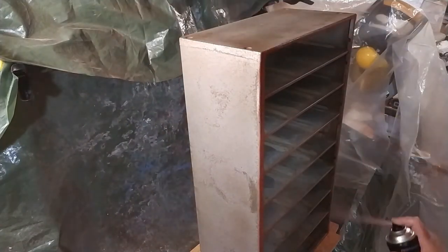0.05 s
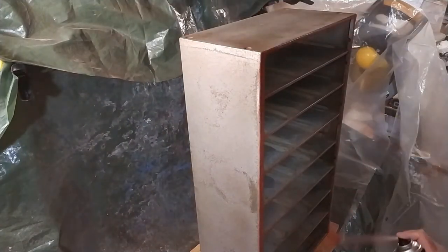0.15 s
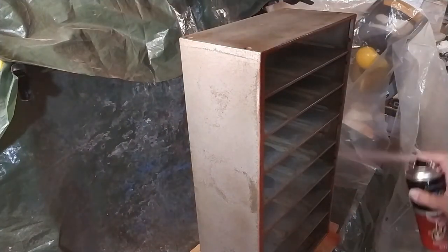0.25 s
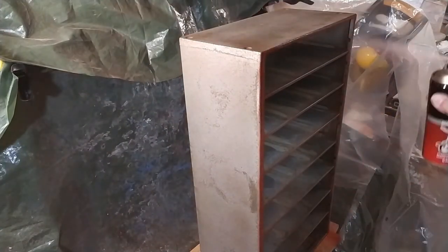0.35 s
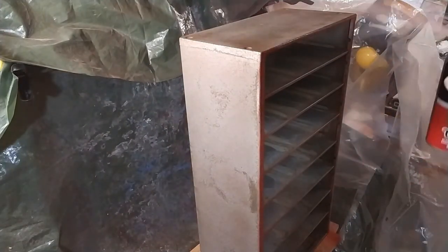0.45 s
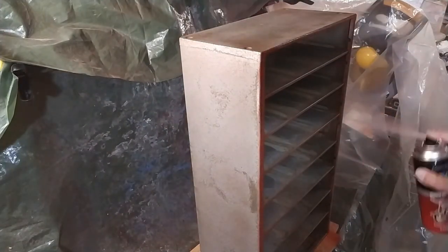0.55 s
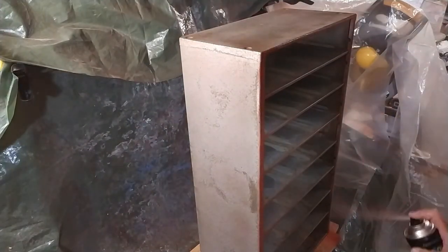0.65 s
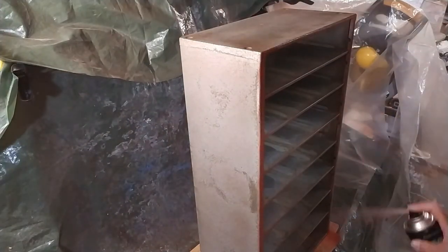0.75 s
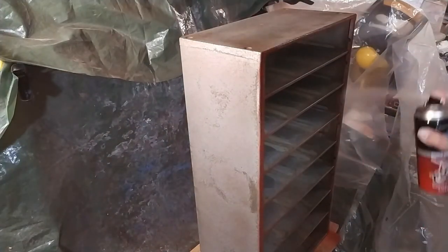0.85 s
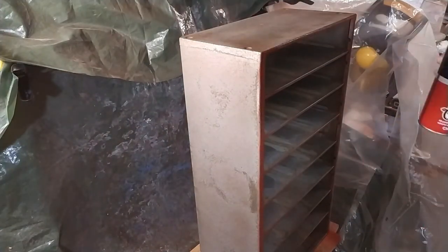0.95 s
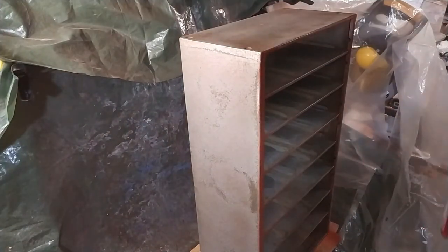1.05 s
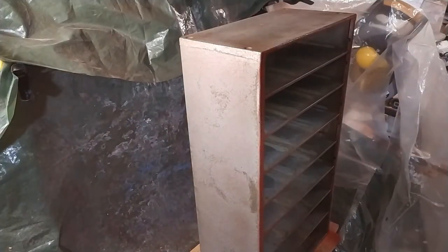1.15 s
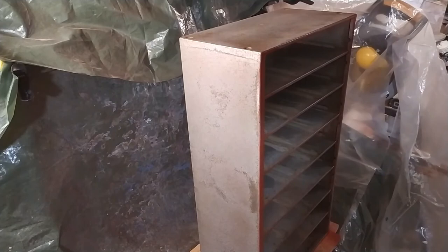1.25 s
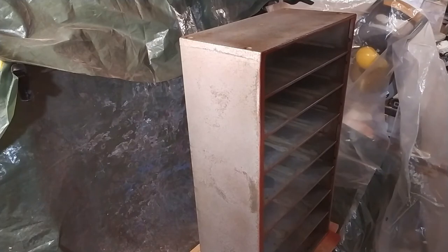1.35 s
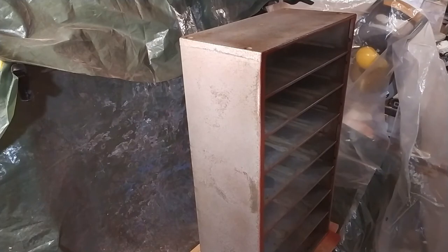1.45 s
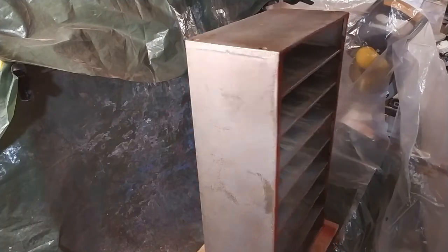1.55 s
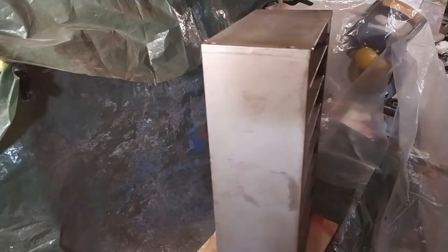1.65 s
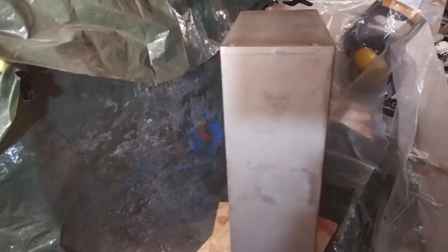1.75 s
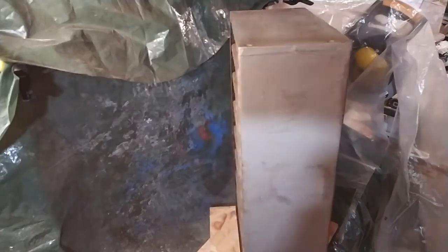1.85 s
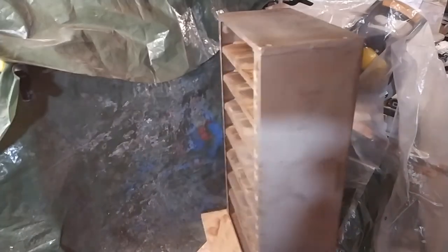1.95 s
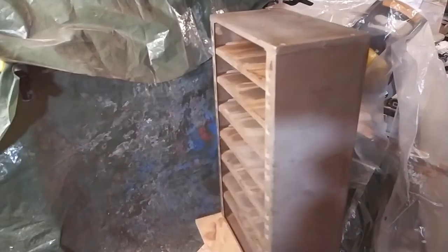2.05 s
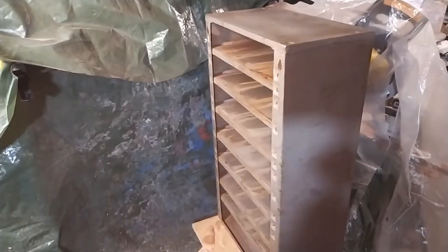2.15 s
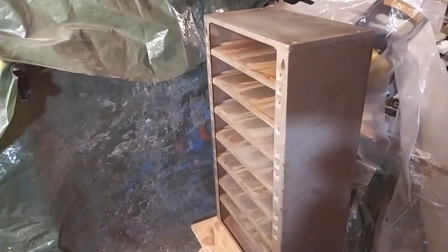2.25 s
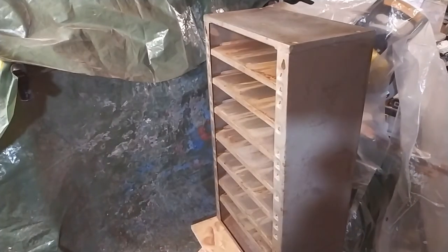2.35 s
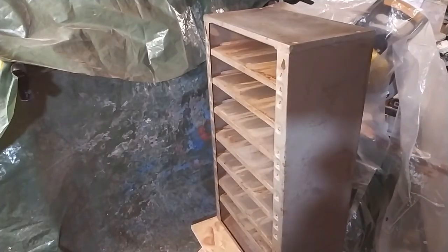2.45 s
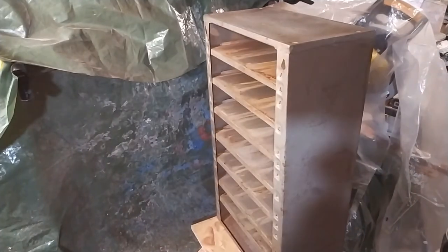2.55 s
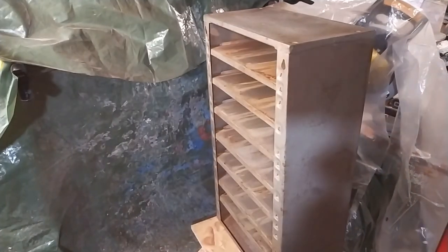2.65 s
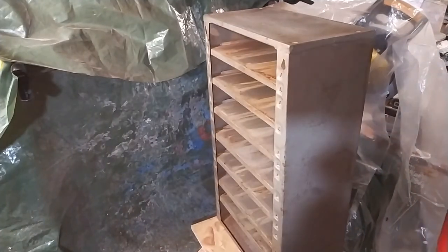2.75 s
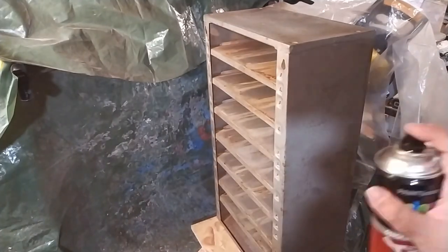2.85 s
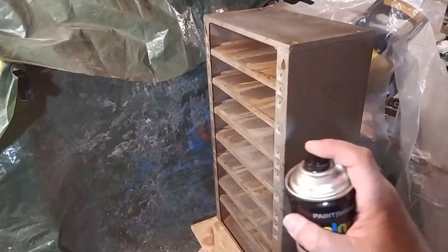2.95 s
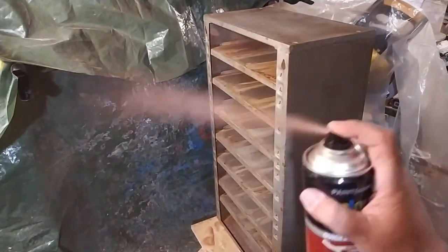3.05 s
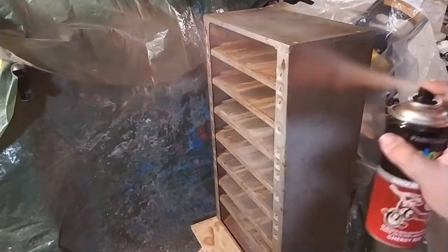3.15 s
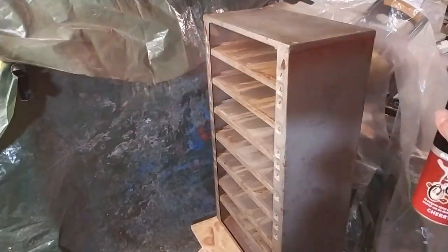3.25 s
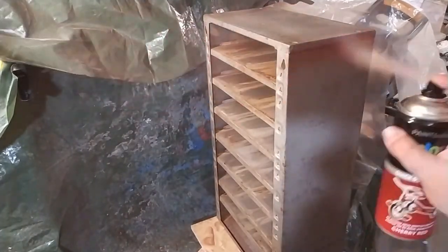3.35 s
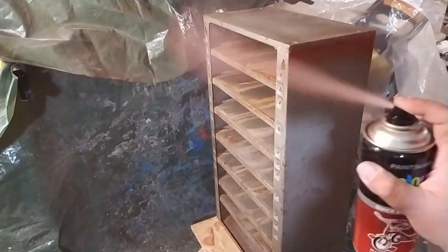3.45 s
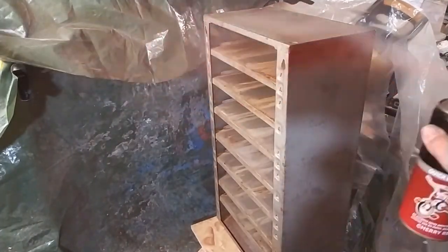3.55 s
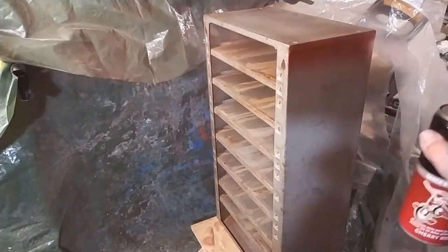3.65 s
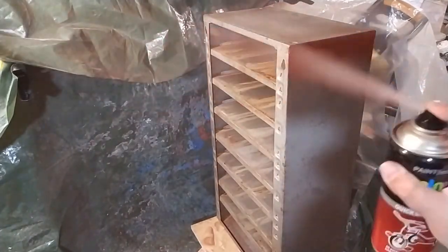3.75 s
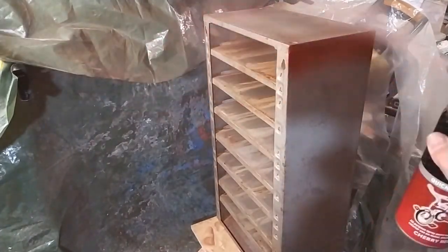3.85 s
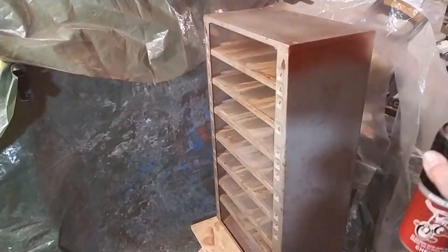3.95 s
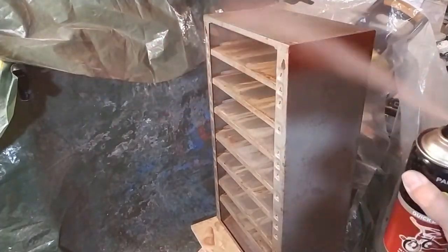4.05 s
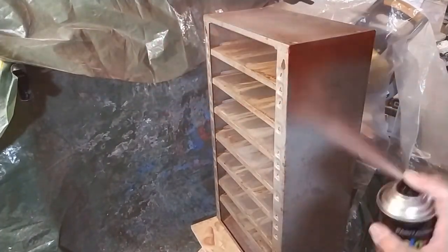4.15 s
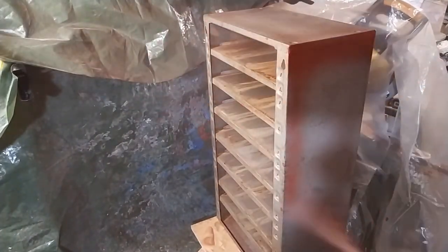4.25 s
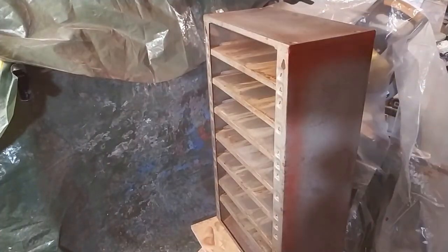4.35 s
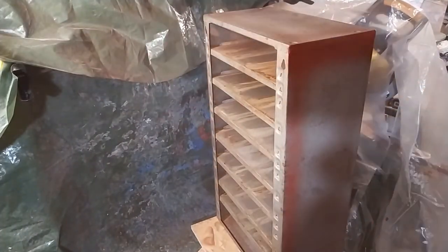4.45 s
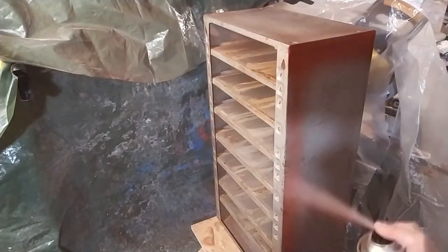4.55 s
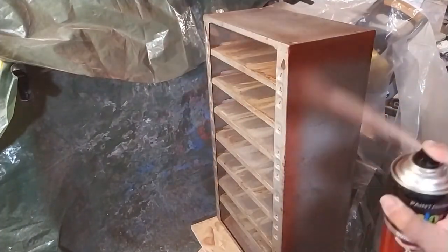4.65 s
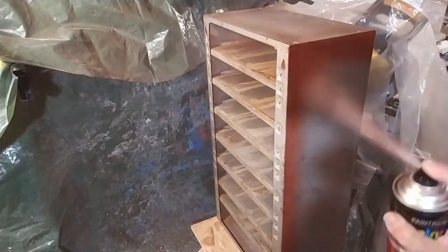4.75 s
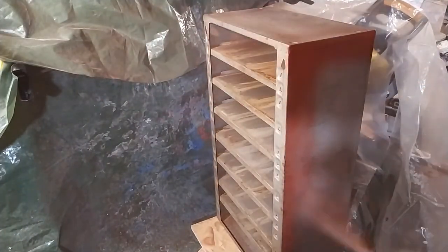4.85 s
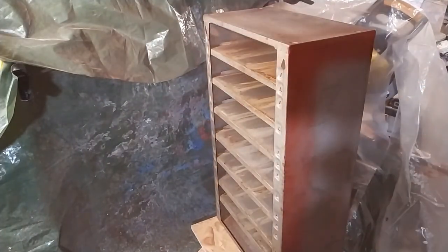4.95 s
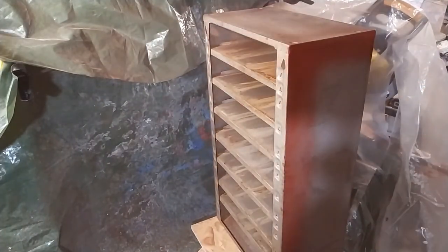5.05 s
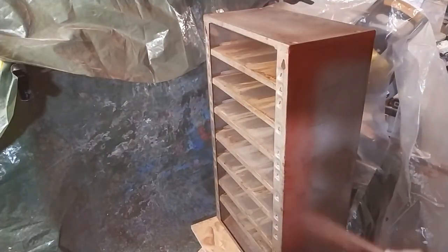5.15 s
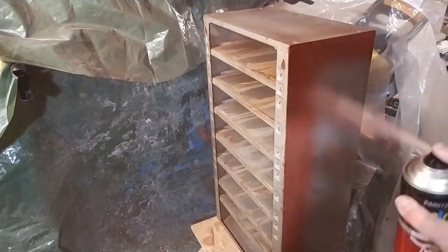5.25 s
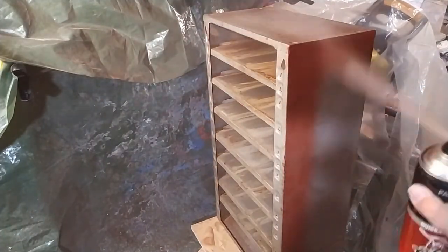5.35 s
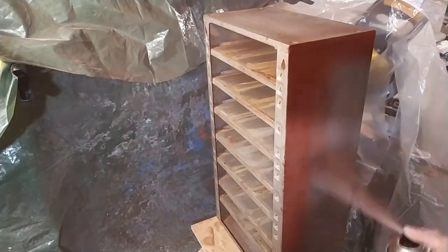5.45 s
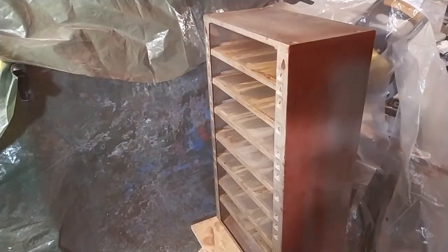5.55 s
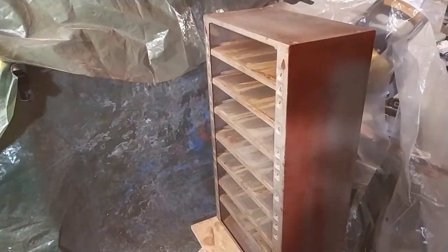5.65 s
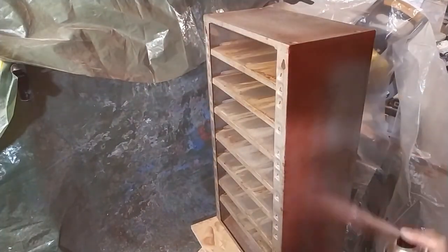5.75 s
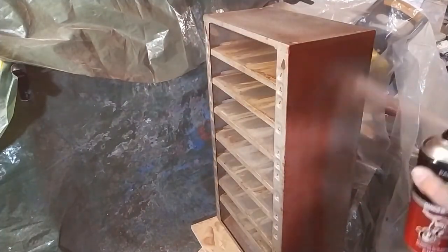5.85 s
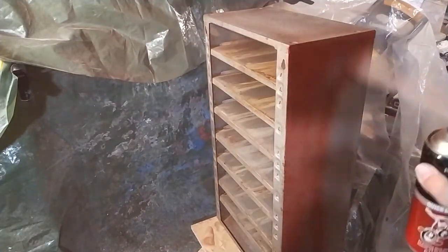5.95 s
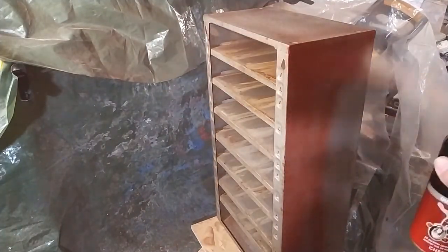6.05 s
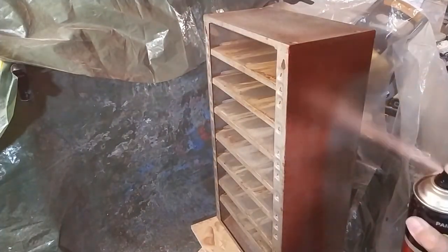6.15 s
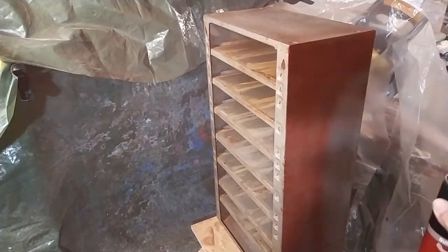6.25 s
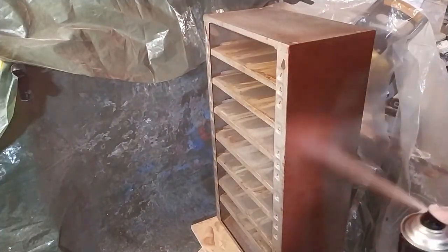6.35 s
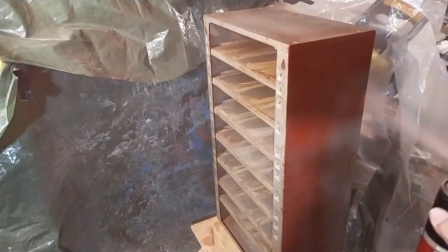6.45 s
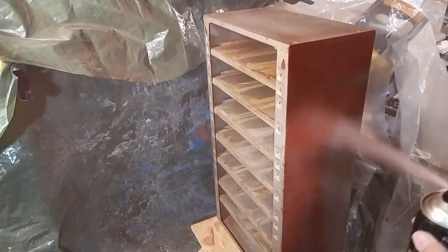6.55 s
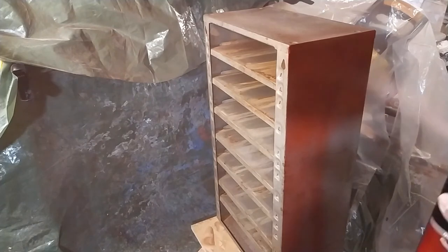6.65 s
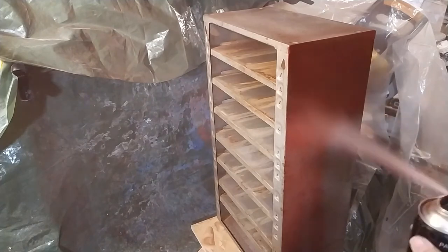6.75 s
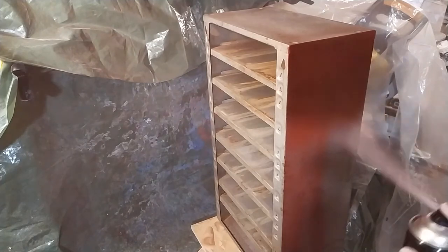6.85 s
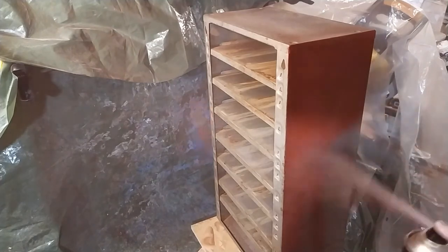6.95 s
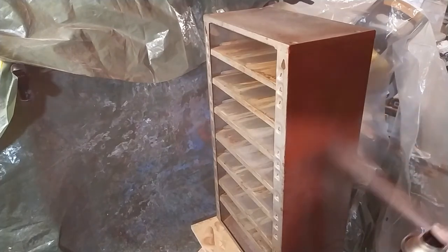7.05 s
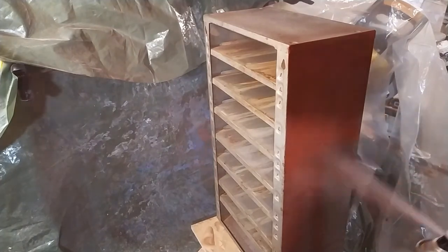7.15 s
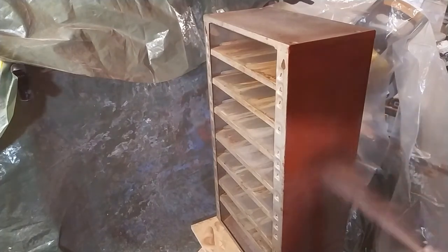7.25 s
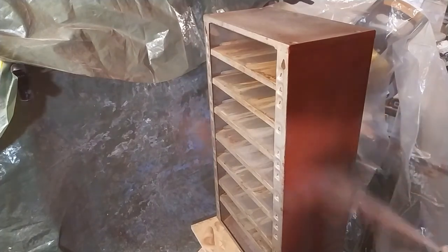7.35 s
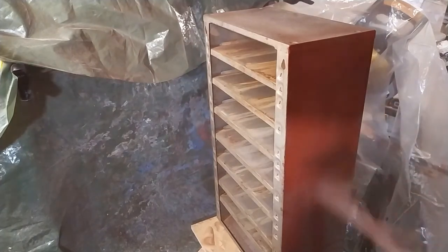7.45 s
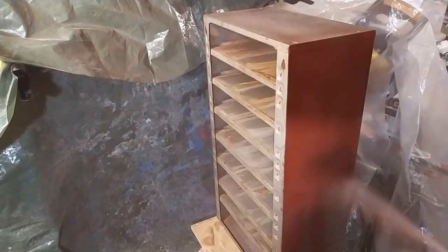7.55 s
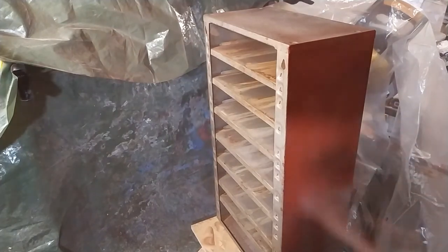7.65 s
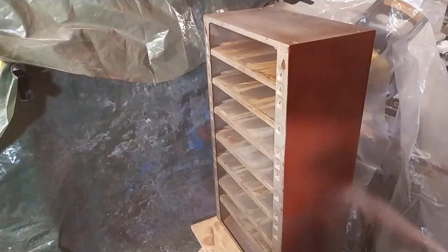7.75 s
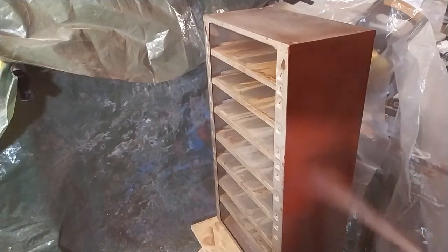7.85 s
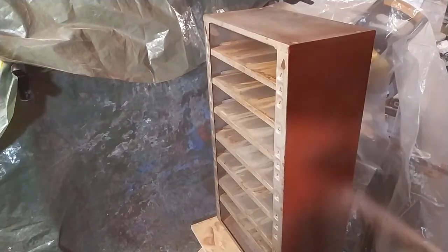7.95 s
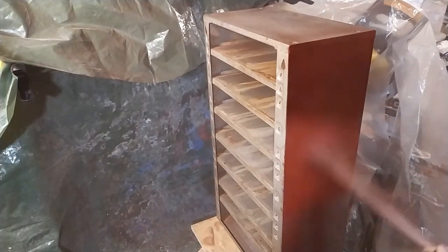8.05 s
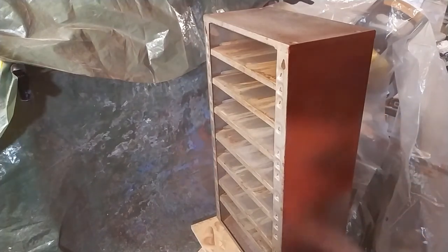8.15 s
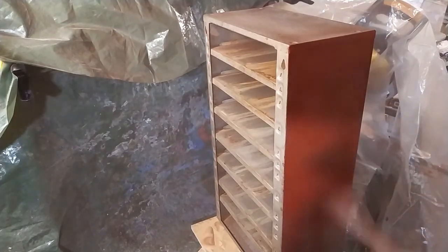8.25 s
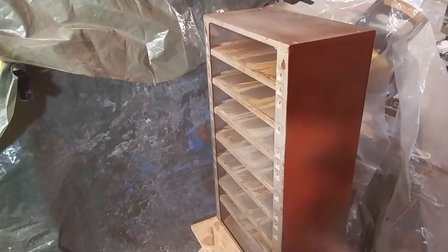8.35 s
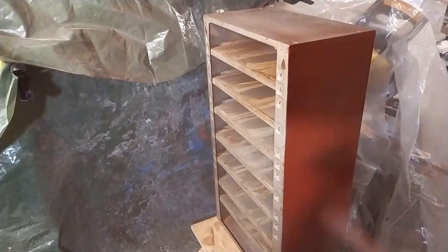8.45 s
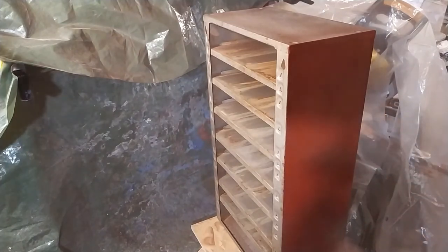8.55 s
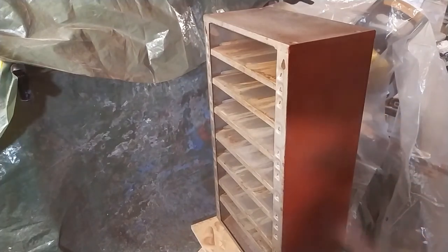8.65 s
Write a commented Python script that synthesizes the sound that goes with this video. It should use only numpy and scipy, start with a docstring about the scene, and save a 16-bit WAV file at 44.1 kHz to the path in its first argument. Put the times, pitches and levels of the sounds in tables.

```python
"""First, close to the microphones, the hiss of an aerosol can spraying a small wooden cabinet.
The place is a workshop hung with plastic sheets. The hiss swirls as the hand sweeps, because its echoes
from cabinet and sheets keep shifting. It stops after a second, and the cabinet is turned on its board
with ticks, scuffs and rustles. The second press opens with a spurt and sags slightly as the can cools.
Behind it all are moving air and a low rumble; later a motor hums far off, through the walls."""
import sys
import numpy as np
from scipy import signal
from scipy.fft import rfft, irfft, next_fast_len
from scipy.io import wavfile
from scipy.ndimage import uniform_filter1d, map_coordinates

SR = 44100
rng = np.random.default_rng(int(sys.argv[2]) if len(sys.argv) > 2 else 0)


def to_wav(s):
    """Save 16-bit WAV."""
    ch = np.atleast_2d(s).T  # columns
    pcm = np.round(np.clip(ch, -1, 1) * 32767)  # PCM
    wavfile.write(sys.argv[1], SR, pcm.astype(np.int16))


N = 383229

# the valve held down, the first time from before the start: open t/s, shut t/s
PRESSES = [(-1, .946), (3.05, 10)]
# each press, into the open shelves, then on the side panel: jet/dB, hollows/dB, background turned down/dB
PRESS_LEVELS = [(-35.5, -56, -1), (-32, -56.5, 17)]
# strokes of the can, higher is nearer the microphones: t/s, height/m
STROKES = [(0, 0.15), (.5, 0.28), (.75, 0.135), (1, 0.29), (3.05, 0.301), (3.35, 0.47), (3.85, 0.371),
           (4.12, 0.45), (4.43, 0.004), (4.63, 0.352), (4.8, 0.405), (4.95, 0.0676), (5.1, 0.0361),
           (5.27, 0.392), (5.42, 0.357), (5.56, 0.093), (5.72, 0.08), (5.9, 0.474), (6.7, 0.452),
           (7.05, 0.274), (7.5, 0.0816), (8, 0.2138), (8.4, 0.026), (8.69, 0.0535)]
# the jet at the nozzle: f/Hz, level/dB
JET_SPECTRUM = [(3600, -37), (6200, -11.5), (7300, -11), (9200, -8), (10500, -6.5), (12500, -4), (14500, 1),
                (15700, 2)]
# the jet below 11 kHz: t/s, gain/dB
JET_BODY_GAIN = [(.5, 2), (3.05, -1.7), (3.9, -0.5), (4.5, 0.5), (5.5, 0), (6.1, -.5), (6.8, 1), (7.5, 2.3),
                 (8.69, 0.8)]
# the jet above 11 kHz: t/s, gain/dB
SIZZLE_GAIN = [(0, 2), (.95, 2), (3.05, -0.5), (3.6, -1.5), (4, 0.5), (4.4, 0.5), (4.85, 1), (5.3, 1),
               (5.7, 1), (6.1, -3), (6.8, -0.7), (7.5, 2), (8.1, 1), (8.69, 2.2)]
# centre of the bright band in the hiss: t/s, f/Hz
SWISH_CENTRE = [(3.4, 10930), (3.9, 11500), (5.3, 12280), (6.2, 10960), (6.6, 9800), (6.9, 8800),
                (7.4, 7440), (8.69, 7300)]
# mist washing over the wood: f/Hz, level/dB
WASH_SPECTRUM = [(1100, -20), (1650, -5.5), (2300, 0.5), (3000, 0), (4200, 1), (5700, 3.5), (6200, -18),
                 (8300, -53)]
# swell of that mist: t/s, gain/dB
WASH_GAIN = [(0, 1.5), (.3, 1.5), (.5, 0), (.95, 1), (3.1, -1), (4, 0.5), (6.2, -0.5), (7, -0.8),
             (7.7, 0.5), (8.69, -2)]
# resonances of the gap between can and cabinet, moving with the can's height:
# f/Hz, half width/Hz, glide/(Hz/m), left gain/dB, right gain/dB, swell/(dB/m)
GAP_PEAKS = [(1909, 327, 450, -22, -27.5, 17.5), (2660, 295, -150, -26, -32.5, -31),
             (3567, 430, 650, -24, -23, 11), (4848, 370, 1500, -21.5, -21.5, 8),
             (5460, 520, -100, -19, -21.5, -4)]
# the cabinet's hollows: f/Hz, level/dB
HOLLOW_SPECTRUM = [(90, -14.5), (130, -8), (172, 2), (235, -16), (325, -1), (390, -3), (470, -1.5),
                   (560, 0), (660, 0), (780, -3), (940, -3), (1100, 0.5), (1300, -2.5), (1480, -2.5),
                   (1900, -12.5), (2500, -30.5)]
# further short echoes from sheets and floor, which make the hiss swirl:
# delay/ms, path change per height/(m/m), relative level/dB, lag at the right microphone/ms
SHEET_ECHOES = [(.9, 0.706, -3.5, 0.448), (1.7, -0.891, -4.5, -0.516), (2.8, -0.59, -2, 0.69),
                (4.098, 1.192, -6.5, -0.785), (6.3, 0.782, -1.5, 0.601)]
# ticks of board and sheets: t/s, relative level/dB, f/Hz, t60/s
TICKS = [(1.017, -34, 1130, 0.0047), (1.068, -46, 1510, .008), (1.082, -43, 4200, .002),
         (1.272, -42, 2010, 0.0052), (1.407, -50, 1650, .006), (1.593, -41, 2010, 0.0063),
         (1.673, -48, 1190, 0.0069), (1.77, -48, 6970, .002), (1.894, -39.5, 1210, 0.0074),
         (1.915, -46, 3750, 0.0068), (1.954, -47, 1400, .008), (1.972, -49, 1600, .006),
         (2.045, -39, 4300, 0.0032), (2.408, -44, 1720, .009), (2.59, -40, 6960, 0.0013),
         (2.718, -40, 9400, 0.0022), (3.015, -46, 1500, .006)]
# modes of one tick: multiple of its pitch, relative level/dB
TICK_MODES = [(.42, -10), (.71, -8), (1, -2), (1.43, -6)]
# the board scuffs as it turns: t/s, level/dB, rise/s, t60/s
SCUFFS = [(1.06, -56, 0.018, 0.17), (1.517, -51, .005, 0.17), (1.58, -59, .01, .2),
          (1.912, -54, .005, 0.17), (2.11, -47.5, 0.022, 0.31), (2.168, -46, .001, 0.064),
          (2.21, -46, 0.0047, 0.18), (2.5, -50, 0.0053, 0.092)]
# the scraping board: f/Hz, level/dB
SCUFF_SPECTRUM = [(300, -7.5), (900, -4), (2200, -2), (4000, -7.5), (8000, -11.5), (15000, -15)]
# the rolling board: f/Hz, level/dB
ROLL_SPECTRUM = [(60, -20), (150, 3), (200, 12.5), (260, -3), (340, 7), (600, -12), (1500, -33)]
# sheets and sleeve rustle near the cabinet: t/s, level/dB, length/s
RUSTLES = [(1.092, -59.5, 0.066), (1.233, -69, .04), (1.527, -54.5, 0.028), (1.765, -58, .015),
           (2.172, -46.5, 0.015), (2.227, -58, 0.048), (2.346, -59, .02), (2.714, -62, 0.072),
           (2.854, -57, 0.23), (3.027, -53.5, 0.038)]
# the rustling plastic: f/Hz, level/dB
RUSTLE_SPECTRUM = [(1000, 5), (4000, 5.5), (8000, -5.5), (9400, 2), (10500, -5), (15800, -4)]
# the motor beyond the walls: t/s, f/Hz, relative level/dB
MOTOR_RUN = [(5.2, 90.8, -64), (5.38, 97.4, -68), (5.93, 94.2, -63), (6.33, 59, -65.5), (6.45, 58.8, -57),
             (6.61, 65.9, -59), (6.75, 71.2, -50.5), (7.04, 74.2, -63.5), (8.31, 77.5, -61),
             (8.69, 82, -67)]
# air moving through the workshop: f/Hz, level/dB
AIR_SPECTRUM = [(70, -25), (130, -40), (190, -1), (260, -14), (330, 0), (470, 0.5), (950, -4), (1150, -1),
                (1900, 0), (2600, -3.5), (5200, -7), (7200, -16), (10600, -21.5), (15800, -20.5)]
# the workshop's low rumble: f/Hz, level/dB
RUMBLE_SPECTRUM = [(10, -48), (18, 2), (38, -5.5), (75, -4), (110, -6.5), (160, -26), (230, -40)]
# decay of the draped room: f/Hz, t60/s
ROOM_DECAY = [(200, 0.18), (2000, 0.075), (8000, 0.13), (15000, 0.027)]
# likeness of diffuse sound at the two microphones: f/Hz, correlation
MIC_CORRELATION = [(60, 0.42), (300, 0.81), (700, 0.71), (1400, 0.21), (3000, -0.28), (7000, 0.11)]
# balance of the microphones: f/Hz, left over right/dB
MIC_BALANCE = [(60, 4.5), (400, 7), (1300, 3.5), (2400, 1), (4400, 0.5), (8000, -0.1), (13000, -0.9)]

SPURT_DB, SPURT_S = 2.5, 0.031  # the opening spurt of a press, and the time to its crest
SAG_DB_PER_S = 0.02  # the can cools and loses pressure
JET_LIFT_DB_PER_M, HOLLOW_LIFT_DB_PER_M = 8.5, 2.5  # louder as the can rises towards the microphones
WASH_DB, WASH_SPURT_DB = -17.5, 5.5  # the mist's broad rush; the mist's rise in the spurt
# the cabinet's strong echo: delay, path change per height, lag at the right microphone
CABINET_MS, CABINET_FOLLOW, CABINET_SKEW_MS = 2.45, 0.17, 0.053
ROLL_DB, ROLL_START_S, ROLL_STOP_S = -65, 1.58, 2.08
AIR_DB, RUMBLE_DB = -57, -62.0
TOP_HZ = 15950
SOUND_SPEED = 343  # m/s


def spray():
    """Close up: the nozzle's jet hisses, mist washes over the wood and the cabinet's hollows answer."""
    age, press_db, hollow_db = press()
    spurt = (age / SPURT_S * np.exp(1 - age / SPURT_S)) ** 2
    sag_db = SAG_DB_PER_S * age
    # paint and gas leave unevenly, so the flow flutters a little
    flow = valve(open_s=0.012, shut_s=0.0092) * amp(0.89 * wobble(30) + 0.14 * wobble(270))
    nozzle = flow * jet(press_db + SPURT_DB * spurt - sag_db)
    mist = flow * amp(press_db + WASH_SPURT_DB * spurt) * wash()
    hollow = flow * amp(hollow_db + HOLLOW_LIFT_DB_PER_M * can_height() - sag_db) * hollows()
    hiss = sweep(np.array([nozzle, nozzle]), lead_ms=0.096, cabinet_db=-5, sheets_db=-2.5, sway_m=0.0356)
    on_wood = sweep(mist, lead_ms=0.082, cabinet_db=-3, sheets_db=-0.5, sway_m=0.0591)
    return hiss + on_wood + hollow


def jet(pressure_db):
    """Gas rushes from the nozzle; the body of the hiss and its top sizzle swell separately."""
    rush = noise(JET_SPECTRUM, patchy_db=5.5)
    treble = filtered(rush, lambda hz: 1 / (1 + (11000 / (hz + 1)) ** 12))
    sizzle = amp(curves(SIZZLE_GAIN)[0]) * treble
    body = amp(curves(JET_BODY_GAIN)[0]) * (rush - treble)
    return amp(pressure_db + aim_db()) * (sizzle + body + swish())


def swish(gain_db=-23, lift_db_per_m=13):
    """A bright band of the hiss that glides in pitch and swells at the top of each stroke."""
    return amp(gain_db + lift_db_per_m * can_height()) * band(curves(SWISH_CENTRE)[0], half_width_hz=890)


def wash():
    """Mist on the wood: a broad rush under gap resonances that glide and trade places along a stroke."""
    height = can_height()
    out = amp(WASH_DB) * noise(WASH_SPECTRUM, patchy_db=3.0)
    for hz, width_hz, glide, left_db, right_db, swell in GAP_PEAKS:
        peak = amp(swell * height) * band(hz + glide * height, width_hz)
        out = out + amp([[left_db], [right_db]]) * peak
    return amp(curves(WASH_GAIN)[0]) * out


def hollows(echo_db=-3.5):
    """The low body of the spray; the cabinet's echo cuts notches in it that wander with the hand."""
    body = diffuse(HOLLOW_SPECTRUM, patchy_db=8.0) * amp(0.41 * wobble(16))
    reflected = echo(body, CABINET_MS, CABINET_FOLLOW, sway_m=0.051, skew_ms=CABINET_SKEW_MS)
    return unit(body + amp(echo_db) * reflected)


def valve(open_s, shut_s):
    """The flow, 0 to 1: the stem sinks and springs back within a few hundredths of a second."""
    return sum(gate(on, off, open_s, shut_s) for on, off in PRESSES)


def press():
    """For every sample: time since the valve opened, and the jet and hollow levels of that press."""
    on, off = np.transpose(PRESSES)
    jet_db, hollow_db, _ = np.transpose(PRESS_LEVELS)
    which = np.searchsorted((off[:-1] + on[1:]) / 2, clock())
    return np.maximum(clock() - on[which], 0), jet_db[which], hollow_db[which]


def can_height():
    """The can's height above the middle of its strokes, in m."""
    height = uniform_filter1d(curves(STROKES)[0], size=SR // 5)
    return height - height.mean()


def aim_db(flick_start_s=5.74, flick_hz=5, flick_db=0.5):
    """The hand sets the level: strokes up and down, later quick wrist flicks, and a slight tremor."""
    flicks = np.sin(2 * np.pi * flick_hz * np.maximum(clock() - flick_start_s, 0))
    return JET_LIFT_DB_PER_M * can_height() + flick_db * flicks + 0.5 * wobble(6.5)


def sweep(pair, lead_ms, cabinet_db, sheets_db, sway_m):
    """Direct sound, left first, plus echoes that follow the hand: a drifting comb at each microphone."""
    out = np.array([pair[0], late(pair[1], lead_ms / 1000)])
    out += amp(cabinet_db) * echo(pair, CABINET_MS, CABINET_FOLLOW, sway_m, CABINET_SKEW_MS)
    for delay_ms, follow, db, skew_ms in SHEET_ECHOES:
        out += amp(sheets_db + db) * echo(pair, delay_ms, follow, sway_m, skew_ms)
    return out * np.std(pair) / np.std(out)


def echo(pair, delay_ms, follow, sway_m, skew_ms):
    """One reflection at both microphones; its path changes with the stroke and the wrist's sway."""
    path_change_m = follow * can_height() + sway_m * wobble(3.5)
    delay = delay_ms / 1000 + path_change_m / SOUND_SPEED
    return np.array([late(x, delay + side * skew_ms / 1000) for x, side in zip(pair, (-.5, .5))])


def ticks(tiny_per_s=22, tiny_db=-56, tiny_t60=0.0079):
    """Dry wooden clacks nearby, each a few short modes and a crack; tiny ones scatter between sprays."""
    out, t = np.zeros((2, N)), np.arange(SR // 20) / SR
    start, end = PRESSES[0][1], PRESSES[1][0]
    tiny = [(start + when * (end - start), tiny_db + 6 * size, 900 * 4 ** high, tiny_t60)
            for when, size, high in rng.random((int(tiny_per_s * (end - start)), 3))]
    for s, db, hz, t60 in list(TICKS) + tiny:
        knock = 0
        for ratio, mode_db in TICK_MODES:
            phase = 2 * np.pi * ratio * hz * t + rng.normal(0, 0.5, (2, 1))
            knock += amp(mode_db - 60 * t / t60) * np.sin(phase)
        crack = 0.21 * rng.standard_normal((2, len(t))) * amp(-60 * t / 0.014)
        attack = 1 - np.exp(-t * hz * 2.2)
        out[:, round(s * SR):][:, :len(t)] += amp(db + 6.0) * (knock + crack) * attack
    return filtered(out, lambda hz: 1 / (1 + 1j * hz / 7000))


def turning():
    """Under the cabinet the board rolls and scrapes in grainy scuffs; around it the sheets rustle."""
    rub = np.zeros(N)
    for s, db, rise, t60 in SCUFFS:
        age = np.maximum(clock() - s, 0)
        rub += amp(db - 60 * age / t60) * (1 - np.exp(-age / rise))
    stir = sum(amp(db) * np.exp(-2 * np.abs(clock() - s) / length) for s, db, length in RUSTLES)
    grain = unit(amp(2.2 * wobble(460)))
    rolling = gate(ROLL_START_S, ROLL_STOP_S, rise_s=.03, fall_s=0.19)
    roll = amp(ROLL_DB) * rolling * diffuse(ROLL_SPECTRUM, patchy_db=9)
    scuff = rub * diffuse(SCUFF_SPECTRUM, patchy_db=2.0)
    rustle = stir * diffuse(RUSTLE_SPECTRUM, patchy_db=12)
    return roll + grain * (scuff + rustle)


def room(x):
    """The short tail of the draped workshop around the microphones."""
    hz, t, spectra = signal.stft(rng.standard_normal((2, SR // 3)), SR, nperseg=256)
    decay = amp(-60 * t / along(ROOM_DECAY, hz)[:, None])
    tail = signal.istft(spectra * decay, SR, nperseg=256)[1]
    return signal.fftconvolve(x, tail / np.linalg.norm(tail[0]), axes=1)[:, :N]


def motor():
    """Far off, a motor slows and pulls up again; only its two lowest orders pass the walls, wavering."""
    hz, db = curves(MOTOR_RUN)
    phase = 2 * np.pi * np.cumsum(hz * (1 + 0.0073 * wobble(13))) / SR
    first = amp(0.55 * wobble(15)) * np.sin(phase + 0.16 * wobble(27))
    second = amp(-19.5 + 6.6 * wobble(18.0)) * np.sin(2 * phase + 0.97 * wobble(50))
    return amp(db + 2.0) * (first + second) * (clock() > MOTOR_RUN[0][0])


def room_tone():
    """Moving air and a low rumble reach the microphones from all around."""
    # the steady background noise, all but the rumble, is turned down while the second spray sounds
    turn_down_db = sum(db * gate(on, off, rise_s=0.0059, fall_s=0.028)
                       for (on, off), (_, _, db) in zip(PRESSES, PRESS_LEVELS))
    air = amp(AIR_DB + 0.13 * wobble(14)) * diffuse(AIR_SPECTRUM, patchy_db=5.5)
    rumble = amp(RUMBLE_DB + 0.44 * wobble(6.9)) * diffuse(RUMBLE_SPECTRUM, patchy_db=5.0)
    return amp(-turn_down_db) * air + rumble


def diffuse(spectrum, patchy_db):
    """Noise from all around: alike at the two microphones in the bass, nearly unrelated in the treble."""
    turn = lambda hz: np.arccos(np.clip(along(MIC_CORRELATION, hz), -1, 1)) / 2
    pair = np.array([noise(spectrum, patchy_db, size=1536) for _ in range(2)])
    mid, side = filtered(pair, lambda hz: np.array([np.cos(turn(hz)), np.sin(turn(hz))]))
    return unit(np.array([mid + side, mid - side]))


def noise(spectrum, patchy_db, size=1024):
    """Coloured noise of rms 1 that arrives by many paths: narrow bands cancel and return on their own."""
    spectra = signal.stft(rng.standard_normal(N), nperseg=size)[2]
    field = rng.standard_normal((2, *spectra.shape))
    for _ in range(2):
        field = uniform_filter1d(uniform_filter1d(field, size=4, axis=1), size=5, axis=2)
    # paths that cancel cut deep notches; paths that add give only mild swells
    power = np.sum(unit(field) ** 2, axis=0)
    fading_db = 10 * np.log10(power / (1 + power / 2) + .01)
    patchy = signal.istft(spectra * amp(patchy_db * fading_db / fading_db.std()), nperseg=size)[1][:N]
    return unit(filtered(patchy, lambda hz: amp(along(spectrum, hz))))


def band(centre_hz, half_width_hz):
    """A narrow band of noise of rms 1 whose centre may glide."""
    slow = filtered(rng.standard_normal(N), lambda hz: 1 / (1 + (hz / half_width_hz) ** 3))
    return unit(slow * np.sin(2 * np.pi * np.cumsum(centre_hz) / SR))


def late(x, delay):
    """x delayed by a time in s that may change from sample to sample."""
    fine = signal.resample_poly(x, 4, 1)
    return np.interp((clock() - delay) * SR * 4, np.arange(len(fine)), fine, left=0, right=0)


def filtered(x, response):
    """x shaped by a gain that is a function of frequency."""
    size = next_fast_len(N + SR // 4)
    return irfft(rfft(x, size) * response(np.fft.rfftfreq(size, 1 / SR)), size)[..., :N]


def gate(start, stop, rise_s, fall_s):
    """0 to 1 and back, with soft edges."""
    t = clock()
    return (1 + np.tanh((t - start) / rise_s)) * (1 - np.tanh((t - stop) / fall_s)) / 4


def wobble(rate):
    """A smooth random curve, rate knots a second."""
    return map_coordinates(rng.standard_normal(int(N * rate / SR) + 4), [clock() * rate])


def curves(rows):
    """One value per sample for each column after the time."""
    times, *columns = np.transpose(rows)
    return [np.interp(clock(), times, column) for column in columns]


def along(points, hz):
    """Rows of f/Hz, value, read on a log frequency axis."""
    freqs, values = np.transpose(points)
    return np.interp(np.log(hz + 1), np.log(freqs + 1), values)


def clock():
    """The time of every sample, in s."""
    return np.arange(N) / SR


def amp(db):
    """Decibels to gain."""
    return 10 ** (np.asarray(db) / 20)


def unit(x):
    """Scale to rms 1."""
    return x / np.sqrt(np.mean(x ** 2) + 1e-20)


def scene():
    """Spray and handling up close, the workshop around them, the motor in the distance."""
    near = spray() + ticks() + turning()
    return near + amp(-7.5) * room(near) + room_tone() + motor()


def record(dry):
    """The left microphone hears more bass; nothing passes above the band limit."""
    return filtered(dry, lambda hz: amp(np.outer([.5, -.5], along(MIC_BALANCE, hz))) * (hz < TOP_HZ))


dry = scene()
out = record(dry)
to_wav(out)
```